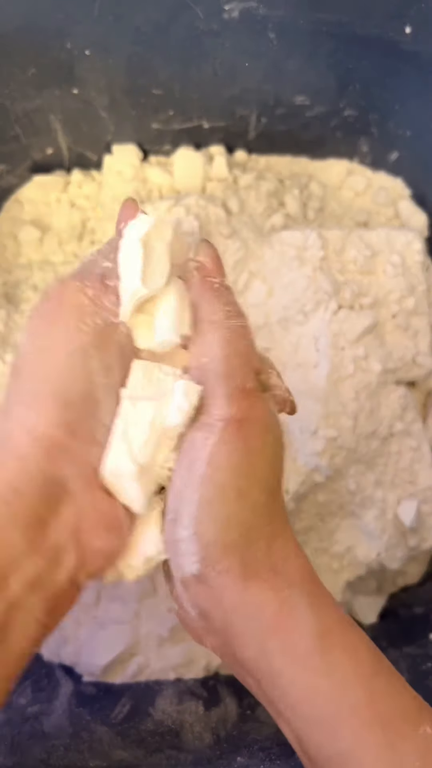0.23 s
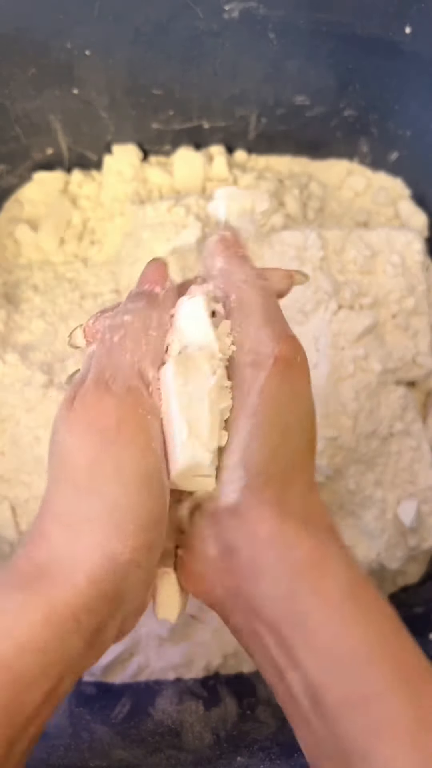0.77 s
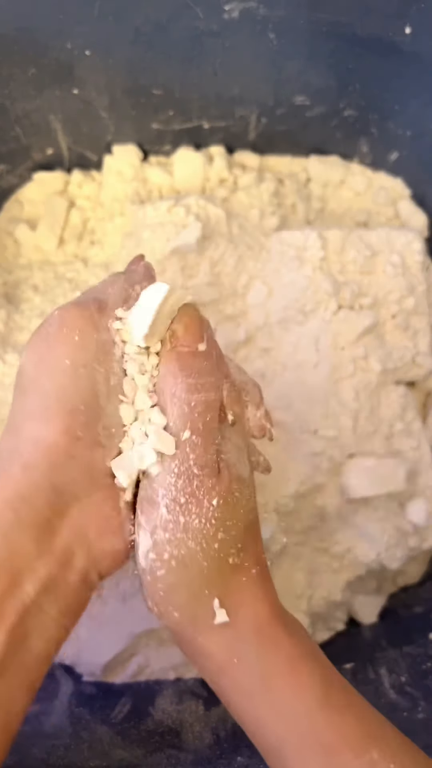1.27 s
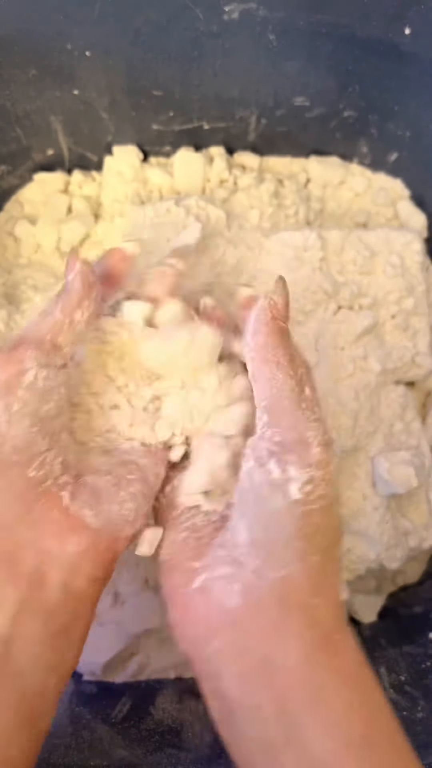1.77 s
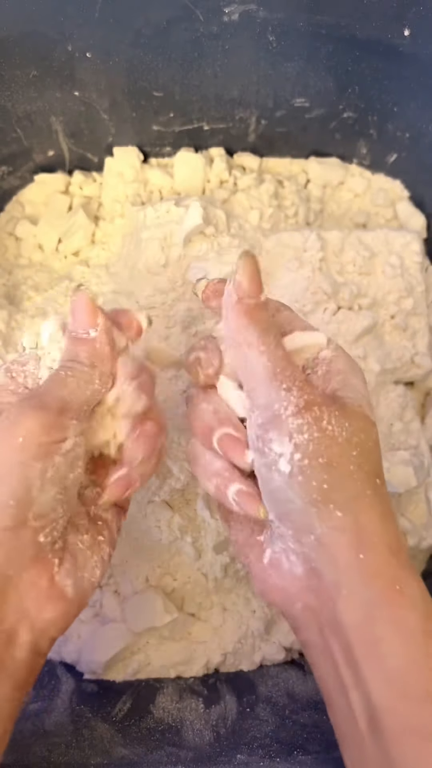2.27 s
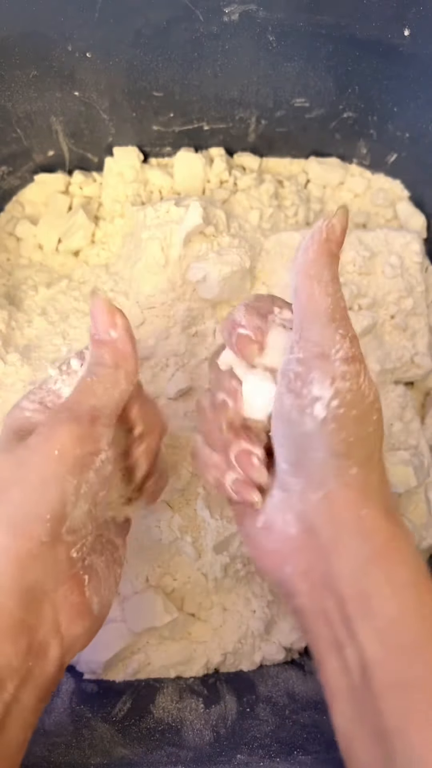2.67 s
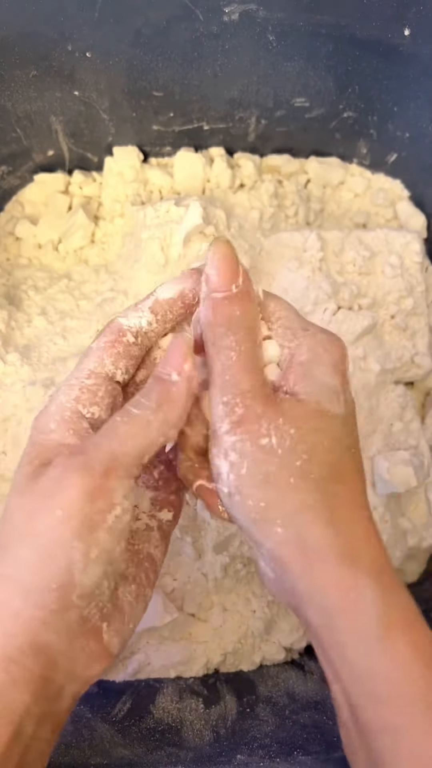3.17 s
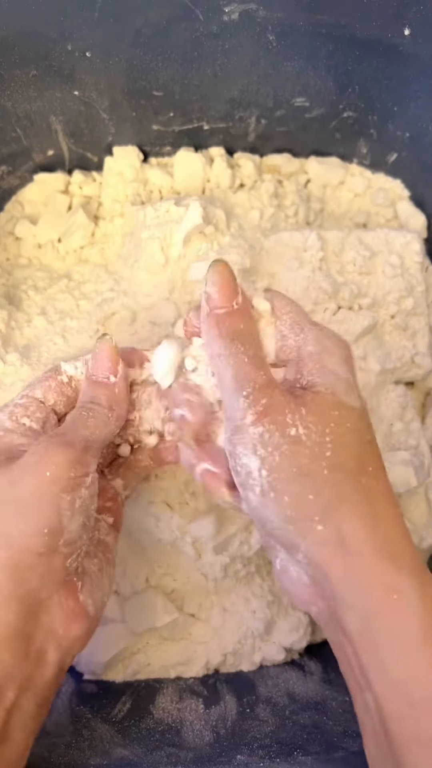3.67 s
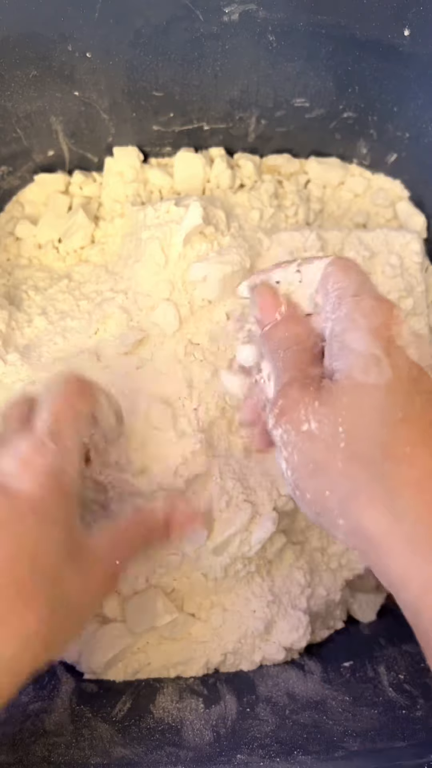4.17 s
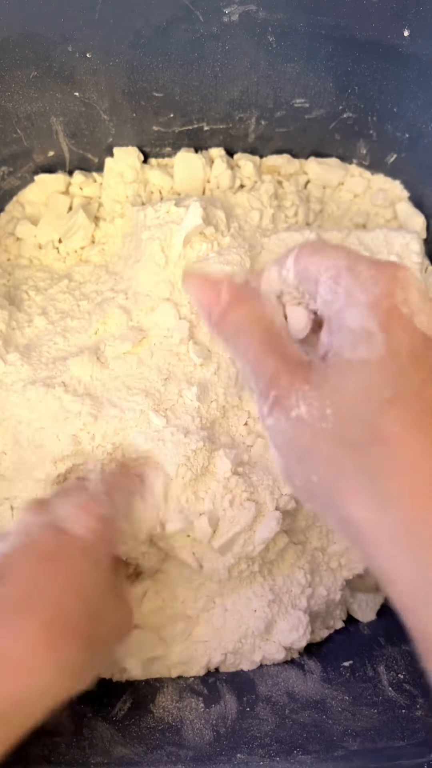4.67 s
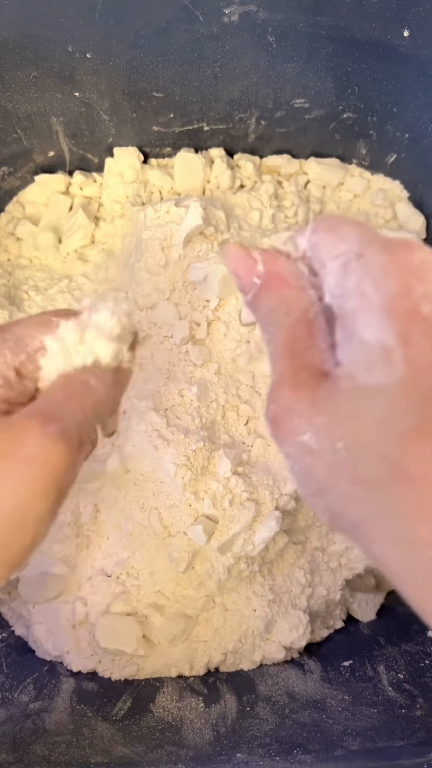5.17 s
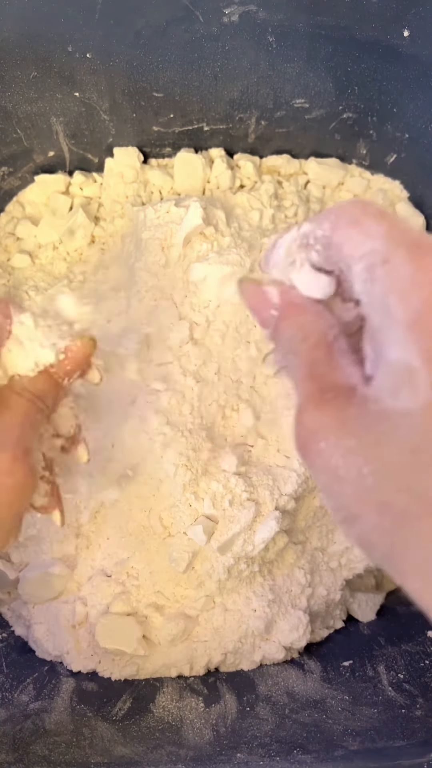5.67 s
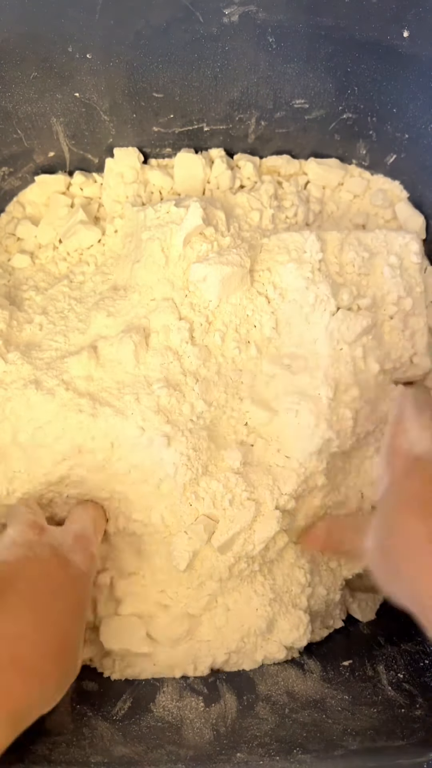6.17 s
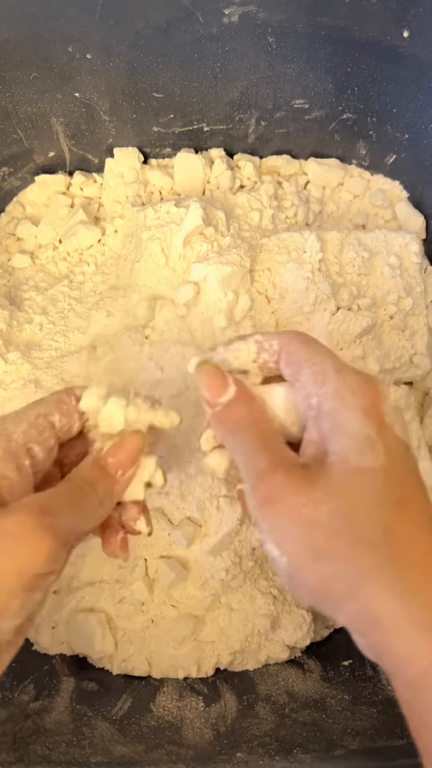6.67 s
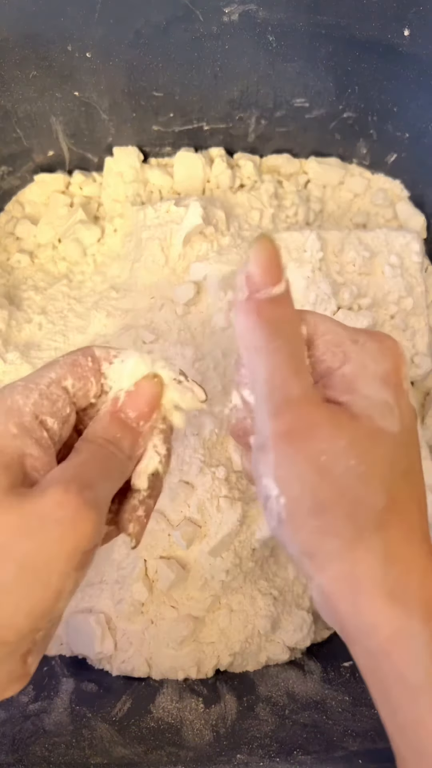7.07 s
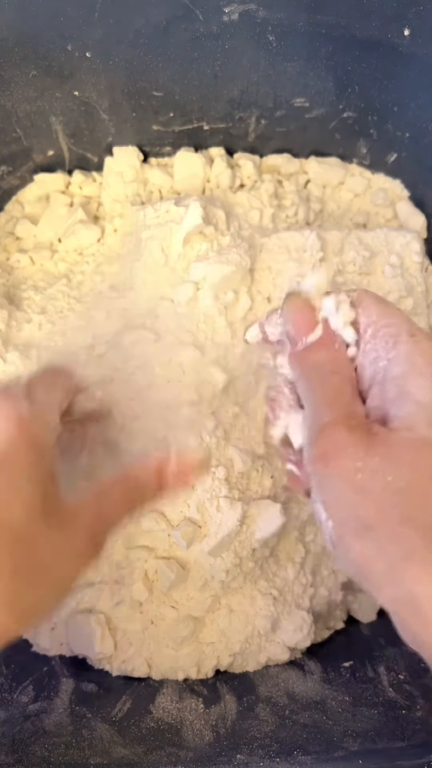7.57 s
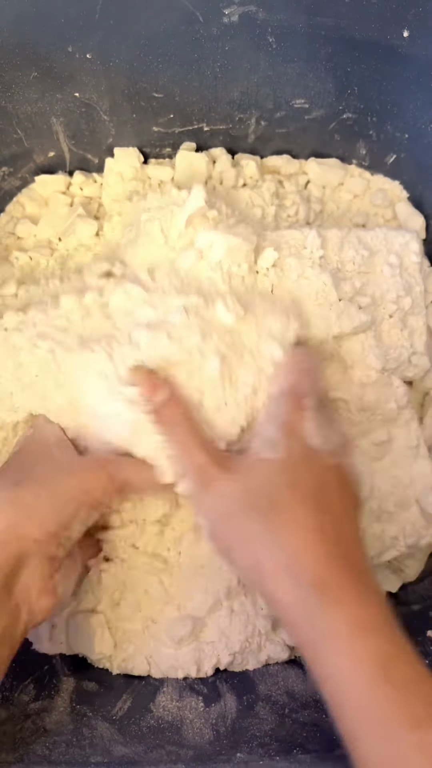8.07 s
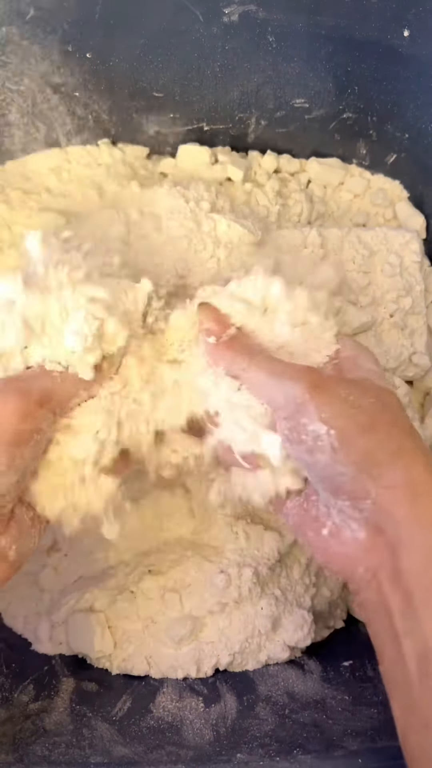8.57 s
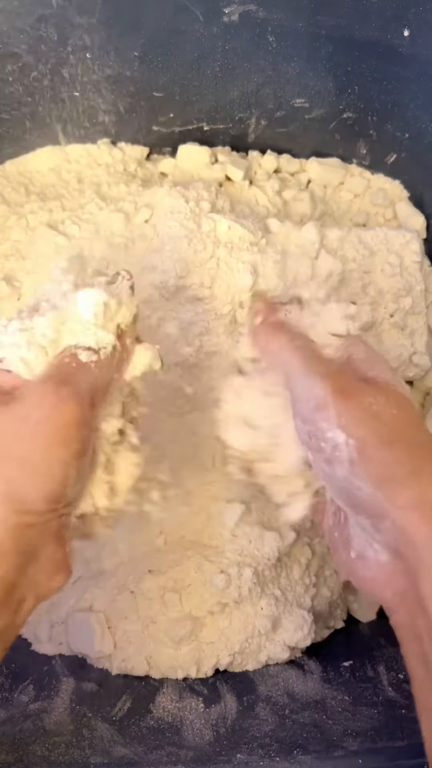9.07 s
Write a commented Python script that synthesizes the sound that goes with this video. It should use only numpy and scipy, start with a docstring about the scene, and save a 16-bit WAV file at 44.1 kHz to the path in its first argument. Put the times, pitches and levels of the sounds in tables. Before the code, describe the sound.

Close, crisp crushing of brittle chalk: sharp cracks, gritty crackle and fizzing dust, then soft thumps and powdery scraping as hands dig and scoop.

```python
"""Crushing chalk over a tub

Two hands crush blocks of gym chalk over a plastic tub of powder, close to a two-port microphone.
Breaks are chirped knocks with ringing modes and noise sprays; grinding is trains of random grains.
Lumps land with dull thuds, and three spells of digging shake the bed, whose tub resonates.
Squeaks, falling crumbs, draught, short reflections and a faint rumble complete the scene."""
import sys
import numpy as np
from scipy import signal
from scipy.fft import rfft, irfft, next_fast_len
from scipy.io import wavfile

SR = 44100
rng = np.random.default_rng(int(sys.argv[2]) if len(sys.argv) > 2 else 0)


def generate_wav(sig):
    """Save sig (samples, or channels by samples) to the path in sys.argv[1] as 16-bit PCM at SR."""
    pcm = np.round(np.clip(np.atleast_2d(sig).T, -1, 1) * 32767).astype(np.int16)
    wavfile.write(sys.argv[1], SR, pcm)


N = 411453
TIME = np.arange(N) / SR
CONTROL_S = TIME[::44]  # coarse time grid: the hands' effort changes slowly
BURST_S = (np.arange(4096) - 2048) / SR  # time around the centre of a short sound
EDGE_HZ = 16300  # upper band limit
LAG_CYCLES = 1.47  # loose powder delays each frequency by this many of its own cycles


def gain_of(db):
    """Decibel definition: 20 dB is a factor of ten in amplitude."""
    return 10 ** (np.asarray(db) / 20)


def evened(x):
    """Normalisation: scales a signal to an rms of 1."""
    return x / np.sqrt(np.mean(x ** 2) + 1e-20)


def read(points, hz):
    """Interpolation of a table along a logarithmic frequency axis."""
    f, value = np.transpose(points)
    return np.interp(np.log(hz + 1), np.log(f), value)


def colour(x, points):
    """Linear filtering: multiplies the spectrum by the gains of a table."""
    size = next_fast_len(x.shape[-1], real=True)
    gains = gain_of(read(points, np.fft.rfftfreq(size, 1 / SR)))
    return irfft(rfft(x, size) * gains, size)[..., :x.shape[-1]]


def add(mix, s, db, sound):
    """Superposition: adds a sound centred on s, with the energy of one millisecond at db."""
    start = round(s * SR) - len(sound) // 2
    sound = sound * gain_of(db) * np.sqrt(SR / 1000 / np.sum(sound ** 2))
    part = mix[max(start, 0):max(start + len(sound), 0)]
    part += sound[max(-start, 0):][:len(part)]


def knock(hz, octaves, lag, size=4096):
    """Dispersion: a pulse around hz whose low part arrives late, so it chirps quickly downward."""
    away = np.log2((np.fft.rfftfreq(size, 1 / SR) + 1) / hz)
    hump = np.exp(1 - np.sqrt(1 + (away / octaves) ** 2)) ** 2
    turns = rng.random() - lag * np.log(2) * away  # lag in cycles of each frequency
    return np.fft.fftshift(irfft(hump * np.exp(2j * np.pi * turns)))


def drift(per_s):
    """Random fluctuation: chance values joined by straight lines, with an rms of 1."""
    knots = np.arange(0, TIME[-1] + 1, 1 / per_s)
    return evened(np.interp(TIME, knots, rng.standard_normal(SR)[:len(knots)]))


def grains(per_s, spread_db, clump_db):
    """Shot noise: random clicks, mostly small and a few large, whose strength swells in clumps."""
    size_db = spread_db * np.minimum(rng.exponential(1, N), 4.5) + clump_db * drift(130)
    polarity = rng.choice([-1, 1], N)
    struck = rng.random(N) < per_s / SR
    return evened(gain_of(size_db) * polarity * struck)


def crackle(pitches, per_s, spread_db, clump_db, octaves, lag):
    """Granular sum: each grain size has its own pitch and its own train of clicks."""
    mix = np.zeros(N)
    for hz in pitches:
        clicks = grains(per_s / len(pitches), spread_db, clump_db)
        mix += signal.oaconvolve(clicks, knock(hz, octaves, lag), "same")
    return evened(mix)


# Breaks of the blocks; levels over a millisecond, before the offset of the knock:
# (time [s], level [dB], pitch of the piece [Hz], level of the splinter spray [dB])
SNAPS = [(0.0823, -34, 2220, -25), (0.3799, -19, 1900, -21.5), (0.464, -14.5, 1670, -23),
         (0.6405, -18, 1410, -33), (0.698, -7, 2770, -17.5), (0.7547, -9.5, 1200, -27),
         (0.7662, -8.5, 1680, -19), (0.81, -12.5, 1740, -13.5), (0.822, -14.5, 2260, -8),
         (0.8622, -15, 2020, -17.5), (0.9837, -10.5, 2330, -12), (1.2419, -25, 1240, -26),
         (1.572, -27, 3280, -27), (1.679, -15, 1260, -26.5), (2.025, -16, 2240, -27.5),
         (2.247, -8.5, 2590, -16), (2.276, -8, 2080, -23), (2.295, -20, 3420, -28),
         (2.3613, -12, 2080, -23), (2.445, -22.5, 2280, -29), (2.485, -14.5, 1410, -19),
         (2.551, -17, 1900, -17), (2.922, -16, 4120, -18.5), (2.9379, -41, 3500, -18.5),
         (2.9515, -23, 3400, -18.5), (3.008, -7, 1680, -17), (3.076, -21, 1490, -22),
         (3.08, -17.5, 1420, -13), (3.105, -42, 2470, -24), (3.122, -18, 2120, -11),
         (3.241, -22, 3380, -22), (3.6908, -21, 2130, -47), (3.787, -21.5, 2520, -23.5),
         (4.3393, -19, 2220, -41), (4.384, -25.5, 2020, -26.5), (4.463, -24.5, 7100, -27),
         (4.4672, -20.5, 3530, -20), (4.592, -23, 1430, -55), (4.9156, -25, 2150, -32.5),
         (5.126, -27, 2400, -22), (5.2478, -48, 3100, -21.5), (5.7593, -13, 5700, -21),
         (5.7677, -39, 3000, -17), (5.8008, -53, 3560, -20), (5.9163, -18, 1240, -18.5),
         (5.96, -10.5, 1320, -35), (6.176, -30, 1160, -24.5), (6.293, -22.5, 1900, -25.5),
         (6.6634, -17.5, 1760, -23), (6.673, -16.5, 2490, -31), (6.689, -6.5, 1810, -14),
         (6.6985, -13.5, 2260, -28), (6.7149, -14.5, 2360, -16), (6.7817, -15, 2060, -19),
         (6.8507, -11.5, 2120, -16.5), (6.891, -25, 2500, -39), (6.906, -21.5, 2280, -45),
         (6.96, -24, 2790, -23), (7.0612, -19.5, 2540, -21.5), (7.0866, -12.5, 2430, -15),
         (7.4961, -23, 2670, -23.5), (8.362, -26, 4700, -42), (8.3734, -11, 2620, -40),
         (8.6845, -16, 1320, -31), (8.756, -24, 2570, -47.5), (8.79, -21, 1650, -23.5),
         (9.1091, -13, 2380, -15), (9.2917, -25, 1500, -49)]
# Relative spectrum of crumbs: (frequency [Hz], level per hertz [dB])
CRUMBS = [(200, -53), (480, -4), (800, -5), (1130, 5), (1600, 5.5), (2750, 6.5), (3400, -1), (5000, -4),
          (7000, -7.5), (12000, -57)]
# Relative spectrum of fine dust and splinters: (frequency [Hz], level per hertz [dB])
DUST = [(1500, -8.5), (3500, -5.5), (5800, -3.5), (8500, -4.5), (11300, -10), (12700, -19), (15200, -14),
        (17000, -36)]
BUMP_DB, BUMP_HZ = -19, 470  # every break jolts the palm; level relative to the table's


def snaps():
    """Brittle fracture: a short knock, ringing modes, splinters, debris and a jolt of the palm."""
    out, t = np.zeros(N), BURST_S
    for s, db, hz, spray_db in SNAPS:
        add(out, s, db - 0.5, knock(hz, octaves=0.58, lag=1.3))
        add(out, s, db - 8, ring(hz, t60=0.011))
        splinters = np.exp(-abs(t) / 0.00029) + 0.66 * np.exp(-abs(t - .002) / 0.00034)  # two puffs
        add(out, s, spray_db, cupped(colour(splinters * rng.standard_normal(len(t)), DUST)))
        debris = np.exp(-abs(t) / 0.00063) * rng.standard_normal(len(t))
        add(out, s, db - 4.5, cupped(colour(debris, CRUMBS)))
        add(out, s, db + BUMP_DB, knock(BUMP_HZ, octaves=0.79, lag=LAG_CYCLES))
    return out


def ring(hz, t60, count=4):
    """Modal decay: a piece of chalk rings in a few unrelated modes around its pitch."""
    t = np.maximum(BURST_S, 0)[:, None]
    modes = np.minimum(hz * 2 ** rng.uniform(-0.617, 0.86, count), EDGE_HZ)
    return (np.sin(2 * np.pi * modes * t) * gain_of(-60 * t / t60)).sum(1)


PALM_ECHO, PALM_DELAY_S = 0.47, (.0004, .001)  # echo gain; shortest and longest delay


def cupped(x):
    """Comb filtering: one quick echo from the palms, its delay drawn anew at each use."""
    return x + PALM_ECHO * np.roll(x, round(SR * rng.uniform(*PALM_DELAY_S)))


IDLE_CRUMBS_DB, IDLE_DUST_DB = -53.5, -65.5  # chalky fingers never rest entirely; before grinding's gains
PEBBLE_MAX_DB = -39  # gain on the pebbles at full firmness; a harder grip makes them no louder


def grinding(crumb_level, dust_level):
    """Granular friction: crumbs crackle and dust fizzes under the same uneven pressure."""
    pressure = gain_of(1.6 * drift(110))
    crumbs = crackle(np.geomspace(600, 6000, num=9), per_s=2000, spread_db=3.3, clump_db=3.0,
                     octaves=0.8, lag=1.22)
    dust = crackle(np.geomspace(3500, 15000, num=6), per_s=4500, spread_db=1.5, clump_db=4.5,
                   octaves=0.36, lag=0.32)
    # a slack hand hardly breaks anything
    firmness = np.clip((crumb_level - gain_of(IDLE_CRUMBS_DB)) / gain_of(PEBBLE_MAX_DB), 0, 1)
    # small fractures that sound in both crumbs and dust
    chips = firmness * cupped(grains(per_s=260, spread_db=5.5, clump_db=-3.0))
    crumbs = evened(pressure * colour(crumbs + 0.59 * chips, CRUMBS))
    dust = evened(pressure * colour(dust + 0.83 * chips, DUST))
    coarse = gain_of(PEBBLE_MAX_DB) * firmness * pebbles()
    return gain_of(-2.8) * crumb_level * crumbs + coarse + gain_of(5) * dust_level * dust


def pebbles(count=400):
    """Discrete fracture: larger crumbs each give a tick of their own pitch and a soft palm bump."""
    out = np.zeros(N)
    for k, (when, size, pitch, weight) in enumerate(rng.random((count, 4))):
        s = (k + 2 * when) / count * TIME[-1]
        db = 5 + 14 * size ** 2  # relative: grinding sets the final level
        add(out, s, db, knock(900 * 4.0 ** pitch, octaves=0.85, lag=1.55))
        add(out, s, db - 1.5 - 14 * weight, knock(470, octaves=0.34, lag=LAG_CYCLES))
    return out


def swell(when, build, release, roundness):
    """Envelope: effort builds up to a peak of 1 and lets go, each at its own rate."""
    away = np.maximum(when - CONTROL_S, (CONTROL_S - when) / release) / build
    return np.exp(-np.minimum(away, 10) ** roundness)


# The hands close on the chalk; levels before grinding's gains:
# (time of the firmest grip [s], build-up time [s], coarse crumb level [dB], fine dust level [dB])
SQUEEZES = [(0.059, 0.092, -32, -42), (0.356, 0.075, -38.5, -50), (0.524, 0.076, -35, -44.5),
            (0.63, 0.078, -40, -47), (0.78, 0.049, -25, -40), (0.985, 0.18, -41, -49.5),
            (1.16, 0.13, -40, -52), (1.55, 0.1, -43.5, -48.5), (1.79, 0.14, -44, -51.5),
            (2.12, 0.16, -45.5, -56), (2.27, 0.098, -40, -49), (2.461, 0.17, -40.5, -48),
            (2.96, 0.12, -40.5, -47.5), (3.095, 0.17, -40.5, -48.5), (3.561, 0.057, -42, -48.5),
            (3.75, 0.13, -40.5, -46), (4.14, 0.19, -47.5, -53.5), (4.45, 0.099, -43.5, -48),
            (4.79, 0.15, -48, -58), (4.941, 0.041, -44, -72), (5.12, 0.09, -40, -53.5),
            (5.275, 0.076, -44.5, -52.5), (5.374, 0.019, -38.5, -44), (5.53, 0.095, -41.5, -57),
            (5.699, 0.23, -46.5, -56.5), (5.99, 0.18, -42.5, -51.5), (6.702, 0.024, -27, -39.5),
            (6.758, 0.023, -38.5, -51), (6.91, 0.083, -45, -48), (7.058, 0.12, -40.5, -46.5),
            (7.39, 0.29, -42, -50), (7.658, 0.08, -40, -58.5), (8.365, 0.049, -26, -54),
            (8.7, 0.2, -41.5, -53.5), (9.001, 0.0074, -20, -42), (9.19, 0.97, -39.5, -55)]
# release is a multiple of the build-up; roundness 1 = a pointed swell, 2 = a bell
GRIP_RELEASE, GRIP_ROUNDNESS = 0.97, 1.76
# a block crumbles a little as it starts to give and after the break; level relative to the snap's
CRUMBLE_S, CRUMBLE_DB, CRUMBLE_RELEASE = 0.0053, -25.5, 0.49


def grip_powers():
    """Energy addition: overlapping squeezes and breaks add as powers of crumbs and of dust."""
    crumbs, dust = np.zeros((2, len(CONTROL_S)))
    for s, build, crumbs_db, dust_db in SQUEEZES:
        grip = swell(s, build, GRIP_RELEASE, GRIP_ROUNDNESS)
        crumbs += (gain_of(crumbs_db) * grip) ** 2
        dust += (gain_of(dust_db) * grip) ** 2
    for s, db, _, _ in SNAPS:
        crumble = swell(s, CRUMBLE_S, CRUMBLE_RELEASE, GRIP_ROUNDNESS)
        crumbs += (gain_of(db + CRUMBLE_DB) * crumble) ** 2
    return crumbs, dust


# Lumps and hands landing in the powder; level over a millisecond, before the offsets of the layers:
# (time [s], level [dB], pitch [Hz])
THUDS = [(0.381, -19.5, 483), (0.599, -12.5, 388), (0.7278, -7, 519), (0.823, -11.5, 57.4),
         (0.928, -20, 1090), (0.9833, -16, 680), (1.0357, -16, 800), (1.082, -13, 676),
         (1.223, -20.5, 1190), (1.2394, -14.5, 644), (1.2503, -16, 384), (1.6798, -10.5, 797),
         (1.688, -5, 516), (2.024, -19.5, 534), (3.0536, -5.5, 580), (3.666, -20, 540), (4.193, -23.5, 433),
         (4.2201, -26, 397), (4.3379, -21.5, 380), (4.492, -22, 610), (4.582, -14, 774), (4.725, -25, 1440),
         (4.951, -25, 920), (5.387, -15, 447), (5.9175, -8.5, 380), (5.9626, 0, 335), (6.398, -20, 780),
         (6.591, -16.5, 1140), (6.6896, -15, 507), (7.71, -11, 323), (7.849, -7, 500), (7.913, -1, 430),
         (7.923, -7, 108), (7.974, -5.5, 577), (8.038, -7.5, 900), (8.087, -10, 414), (8.228, -13.5, 470),
         (8.329, -17, 960), (8.373, -5.5, 1010), (8.404, -11.5, 720), (8.499, -11.5, 600),
         (8.6846, -10.5, 535), (8.791, -14.5, 312), (9.0085, -14.5, 474), (9.1067, -10.5, 486),
         (9.291, -14, 543)]
# Relative spectrum of the powder bed: (frequency [Hz], level per hertz [dB])
BED = [(25, -5), (65, 1), (130, -6.5), (290, -1), (450, 1), (700, -22.5), (1200, -16), (1600, -29),
       (3000, -50)]
FIRM_HZ = 504  # lumps above this pitch stay firm; lower ones are heavier, duller and sink in
SINK_S = 0.00294  # a hard lump takes at least this long to sink to its own pitch


def thuds():
    """Inelastic impact: lumps crunch and knock, and heavy ones settle with louder soft slips."""
    out, t = np.zeros(N), (np.arange(8192) - 4096) / SR
    for s, db, hz in THUDS:
        weight = np.clip(2 * np.log2(FIRM_HZ / hz), 0, 1)
        lag = max(LAG_CYCLES, SINK_S * hz)
        add(out, s, db - 6, knock(hz, octaves=0.62 + 0.094 * weight, lag=lag, size=len(t)))
        crunch = np.exp(-abs(t) / 0.005) * rng.standard_normal(len(t))
        add(out, s, db - 21.0, colour(crunch, CRUMBS))
        sparse = rng.standard_normal(len(t)) ** 5  # the fifth power leaves a few strong slips
        settling = (t > 0) * np.exp(-abs(t) / .016) * sparse
        add(out, s, db - 21.0 + 9 * weight, colour(settling, BED))
    return out


# The hands push into the bed or lift from it; bed level before stirring's gain:
# (time of the deepest push [s], build-up time [s], bed level [dB], finger scraping level [dB])
DIGS = [(4.245, 0.049, -47.5, -49.5), (4.36, 0.053, -46.5, -44.5), (4.495, 0.027, -43.5, -39),
        (4.589, 0.037, -38.5, -36.5), (4.7, 0.098, -50, -45.5), (6.02, 0.079, -40, -47),
        (6.158, 0.055, -36.5, -33), (6.24, 0.13, -40.5, -36), (7.735, 0.045, -39, -52),
        (7.879, 0.077, -34, -32.5), (7.935, 0.057, -27.5, -53), (8.007, 0.052, -31.5, -25),
        (8.125, 0.045, -31.5, -38.5), (8.3, 0.22, -50, -37)]
DIG_RELEASE, DIG_ROUNDNESS = 1.15, 1.5  # as for the grip
SCRAPE_LAG_S = 0.0028  # after each push the fingers drag on through the powder


def dig_powers():
    """Energy addition: overlapping pushes add as powers of the bed and of the scraping in it."""
    bed, scrape = np.zeros((2, len(CONTROL_S)))
    for s, build, bed_db, scrape_db in DIGS:
        push = swell(s, build, DIG_RELEASE, DIG_ROUNDNESS)
        drag = swell(s + SCRAPE_LAG_S, build, DIG_RELEASE, DIG_ROUNDNESS)
        bed += (gain_of(bed_db) * push) ** 2
        scrape += (gain_of(scrape_db) * drag) ** 2
    return bed, scrape


# Handfuls of crumbs pour back onto the bed; level before stirring's gain:
# (time of the thickest fall [s], build-up time [s], level [dB])
POURS = [(8.13, 0.17, -35.5), (8.37, 0.072, -33.5), (8.62, 0.15, -39.5), (9.1, 0.74, -45.5)]
SPILL_LAG_S, SPILL_DB = 0.013, -17.5  # squeezed crumbs trickle down; level relative to the crumbs'
SETTLE_S, SETTLE_DB = 0.053, -32  # the bed goes on slipping after a thud; level relative to the thud's


def spill_power(crumbs):
    """Delayed response: trickling crumbs follow the grip, and each thud leaves a decaying tail."""
    spill = gain_of(SPILL_DB) ** 2 * np.interp(CONTROL_S - SPILL_LAG_S, CONTROL_S, crumbs)
    for s, build, db in POURS:
        spill += (gain_of(db) * swell(s, build, DIG_RELEASE, DIG_ROUNDNESS)) ** 2
    for s, db, _ in THUDS:
        decay = np.exp(-abs(CONTROL_S - s) / SETTLE_S)
        spill += (CONTROL_S > s) * (gain_of(db + SETTLE_DB) * decay) ** 2
    return spill


def efforts():
    """Amplitude from power: levels over time of crumbs, dust, bed, scraping and falling crumbs."""
    crumbs, dust = grip_powers()
    bed, scrape = dig_powers()
    spill = spill_power(crumbs)
    crumbs = crumbs + gain_of(IDLE_CRUMBS_DB) ** 2
    dust = dust + gain_of(IDLE_DUST_DB) ** 2
    return [np.interp(TIME, CONTROL_S, np.sqrt(power)) for power in (crumbs, dust, bed, scrape, spill)]


# falling crumbs are too light to shake the bed: they patter in a band around one pitch
SPILL_HZ, SPILL_OCTAVES = 406, 1.37


def stirring(level, spill_level):
    """Granular yielding: the bed gives in soft, low slips, and crumbs patter on its surface."""
    slips = crackle(np.geomspace(70, 1800, num=9), per_s=800, spread_db=3.8, clump_db=0.0,
                    octaves=0.7, lag=LAG_CYCLES)
    scrunch = gain_of(1.5 * drift(70))
    deep = evened(scrunch * colour(slips, BED))
    band = SPILL_HZ * 2 ** (SPILL_OCTAVES * np.array([-.5, .5]))
    patter = grains(per_s=400, spread_db=3.0, clump_db=3.0)
    surface = evened(signal.lfilter(*signal.butter(2, band, "band", fs=SR), patter))
    return gain_of(3.0) * (level * deep + spill_level * surface)


# Modes of the tub: (frequency [Hz], bandwidth [Hz], level over the direct sound [dB])
TUB = [(125, 16, 16), (180, 22, 13), (225, 11, 5), (361, 36, 2)]


def tub(x):
    """Resonance: the plastic walls ring in damped modes after whatever shakes the bed."""
    t = TIME[:SR // 2]
    modes = np.zeros(len(t))
    for hz, width, db in TUB:
        decay = np.exp(-np.pi * width * t)
        modes += gain_of(db) * 2 * np.pi * width / SR * decay * np.cos(2 * np.pi * hz * t)
    return x + signal.oaconvolve(x, modes)[:N]


# Relative spectrum of fingers in powder: (frequency [Hz], level per hertz [dB])
SCRAPE = [(400, 14), (1100, 14), (2800, 0.5), (7500, -6.5), (15000, -20)]


def scraping(level):
    """Sliding friction: fingers plough through the powder in a crumbly rush of small slips."""
    slips = crackle(np.geomspace(600, 12000, num=9), per_s=2200, spread_db=2.8, clump_db=2.0,
                    octaves=0.5, lag=2.5)
    return level * evened(colour(slips, SCRAPE))


# Squeaks under the digging fingers; level over a millisecond:
# (time [s], half length [s], level [dB], stick-slip rate [Hz])
SQUEAKS = [(6.044, 0.0028, -21, 3300), (6.123, 0.0028, -24, 3450), (6.231, 0.024, -24, 3780),
           (8.123, .009, -25, 3790)]
SQUEAK_JITTER, SQUEAK_OVERTONE = 0.092, 0.76  # the slips come unevenly; share of the octave


def squeaks():
    """Stick-slip: packed chalk catches and slips so fast that it gives a short, rough tone."""
    out = np.zeros(N)
    for s, length, db, hz in SQUEAKS:
        rate = hz * (1 + SQUEAK_JITTER * drift(1500)[:len(BURST_S)])
        phase = 2 * np.pi * np.cumsum(rate) / SR
        tone = np.sin(phase) + SQUEAK_OVERTONE * np.sin(2 * phase)
        add(out, s, db, np.exp(-(BURST_S / length) ** 2) * tone)
    return out


DRAUGHT_HZ, DRAUGHT_DB = (50, 142), -16  # band edges; level relative to the bed effort


def draught(level):
    """Turbulence: air pushed by the digging hands flutters at each port on its own."""
    band = signal.butter(2, DRAUGHT_HZ, "band", fs=SR)
    flutter = evened(signal.lfilter(*band, rng.standard_normal((2, N))))
    return gain_of(DRAUGHT_DB) * level * flutter


def reflections(x, t60, db, apart_hz):
    """Diffuse field: a decaying tail, alike at both ports in the bass, unrelated above apart_hz."""
    t = TIME[:SR // 2]
    mid, side = rng.standard_normal((2, len(t))) * gain_of(-60 * t / t60) * (t > .0008)
    side = signal.lfilter(*signal.butter(1, min(apart_hz, SR / 3), "high", fs=SR), side)
    tail = np.array([mid + side, mid - side]) / np.linalg.norm(mid)
    return gain_of(db) * signal.oaconvolve(x[None], tail, axes=1)[:, :N]


# Relative spectrum of the room's rumble: (frequency [Hz], level per hertz [dB])
ROOM = [(22, -22), (55, -5), (120, -9.5), (400, -17), (1500, -25), (16000, -82.5)]
RUMBLE_DB = -58


def rumble():
    """Partial coherence: coloured noise, part shared by both ports and part separate."""
    shared = rng.standard_normal(N)
    separate = 0.97 * rng.standard_normal((2, N))
    return gain_of(RUMBLE_DB) * evened(colour(shared + separate, ROOM))


def scene():
    """Superposition: hands and bed, spread a little between the ports, in a small rumbling room."""
    crumbs, dust, bed, scrape, spill = efforts()
    chalk = snaps() + grinding(crumbs, dust) + scraping(scrape) + squeaks()
    chalk = chalk + tub(thuds() + stirring(bed, spill))
    side = 0.039 * drift(500) * np.gradient(chalk)  # a slope term: sound reaches one port slightly earlier
    turn = 2 * np.pi * TIME  # the reflections shift as the hands move: two tails trade, one turn a second
    room = np.zeros((2, N))
    for share in (np.cos(turn), np.sin(turn)):
        room += reflections(chalk * share, t60=0.064, db=-12.0, apart_hz=342)
    return np.array([chalk + side, chalk - side]) + room + draught(bed) + rumble()


# Phase lead of the left channel over the right: (frequency [Hz], lead [rad])
CHANNEL_LEAD = [(400, 0), (520, .7), (700, .7), (950, 0), (4700, -.1), (5400, .9), (7000, 1.3), (15000, 1.5)]


def record(dry):
    """Transduction: two channels that differ in phase, clipping at full scale, then a band limit."""
    lead = read(CHANNEL_LEAD, np.fft.rfftfreq(N, 1 / SR))
    pair = irfft(rfft(dry) * np.exp(.5j * np.array([lead, -lead])), N)
    pair = np.clip(pair, -1, 1)
    lowpass = signal.firwin(255, EDGE_HZ, window=("kaiser", 8), fs=SR)
    return signal.oaconvolve(pair, lowpass[None], "same")


dry = scene()
out = record(dry)
generate_wav(out)
```